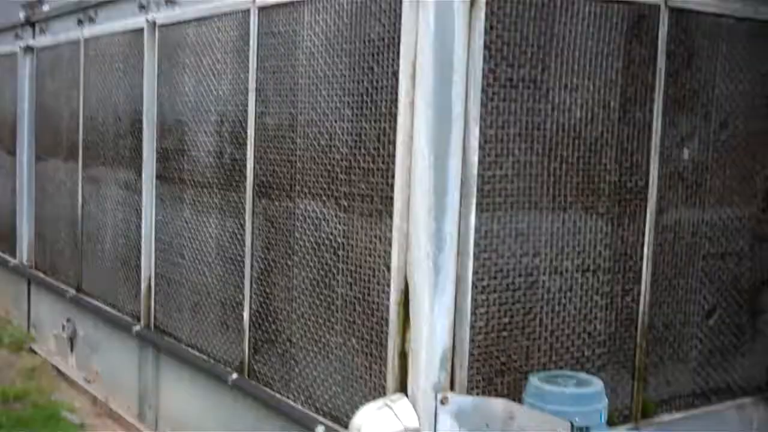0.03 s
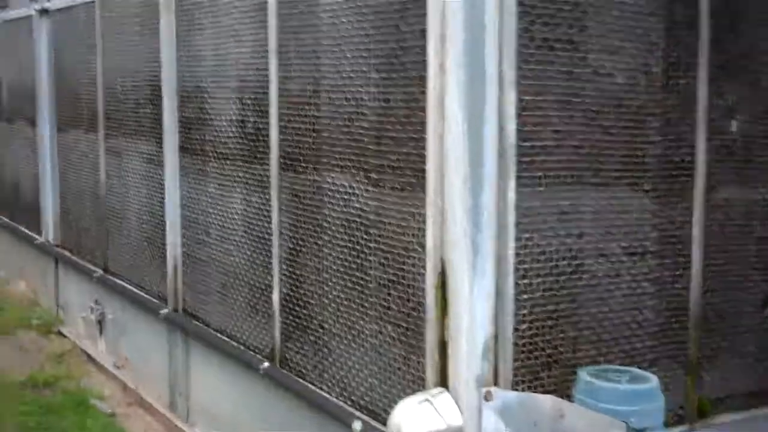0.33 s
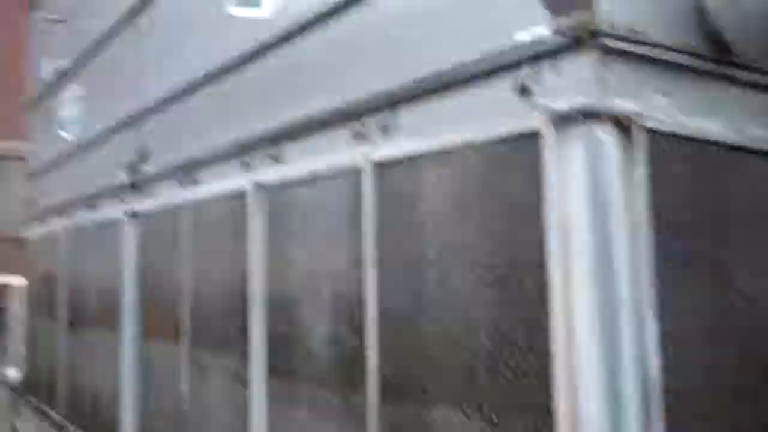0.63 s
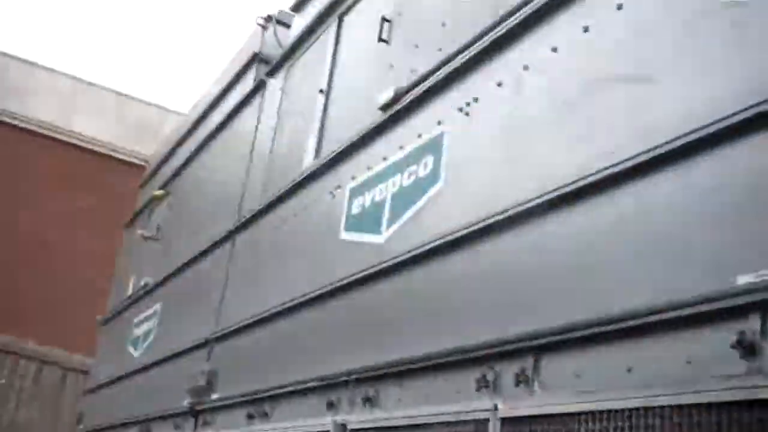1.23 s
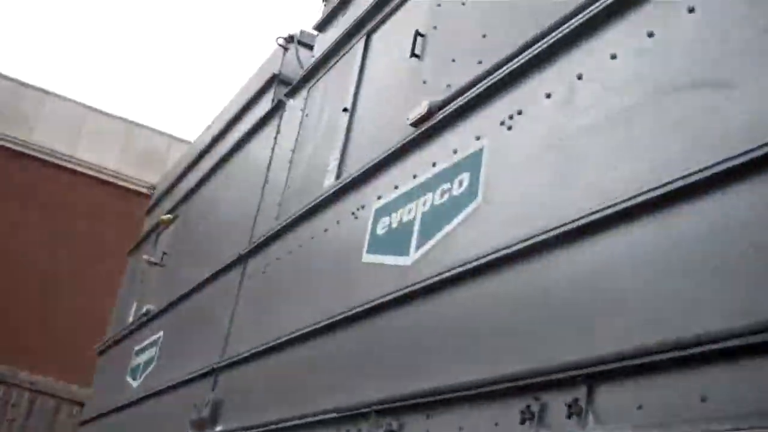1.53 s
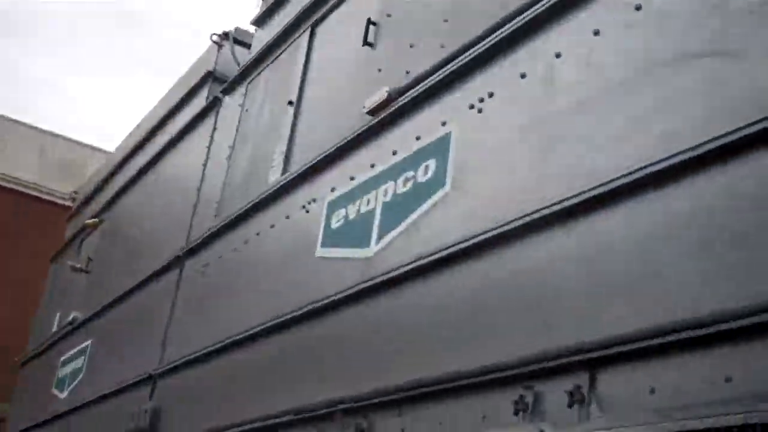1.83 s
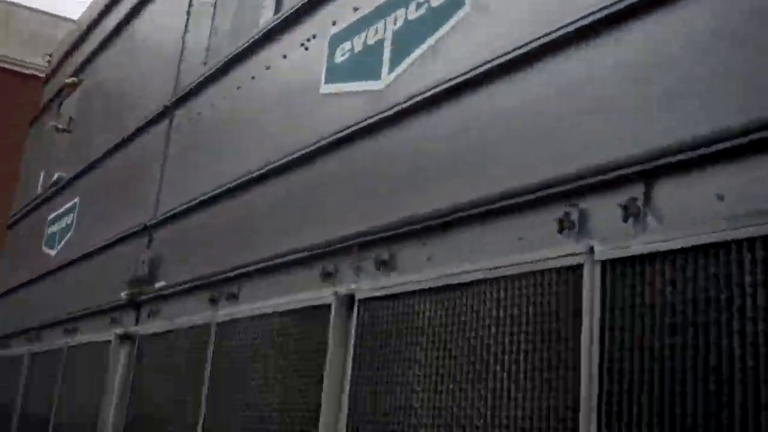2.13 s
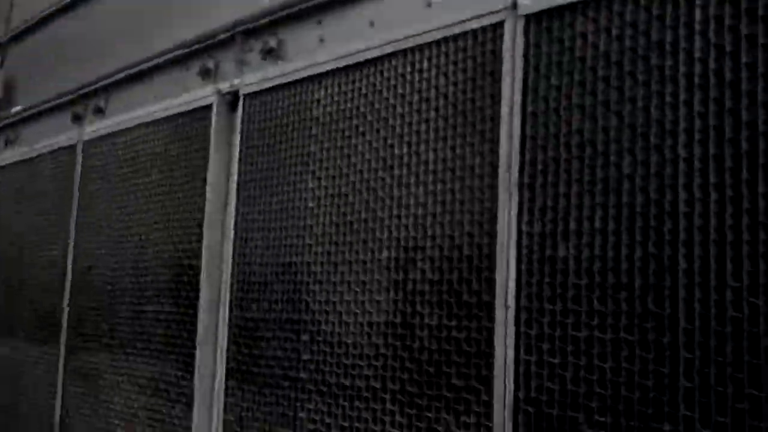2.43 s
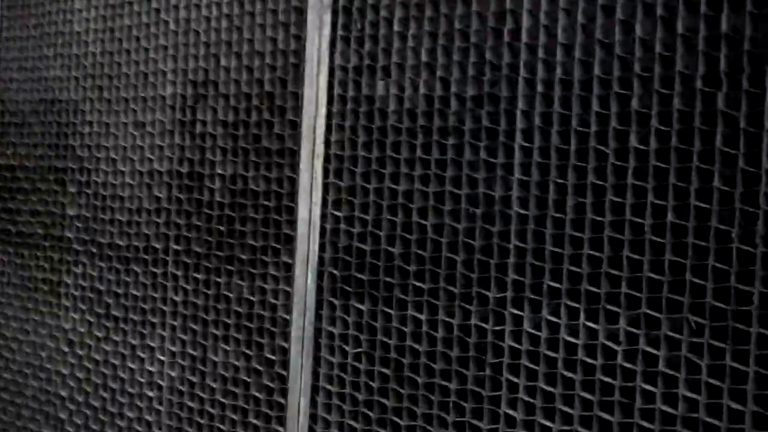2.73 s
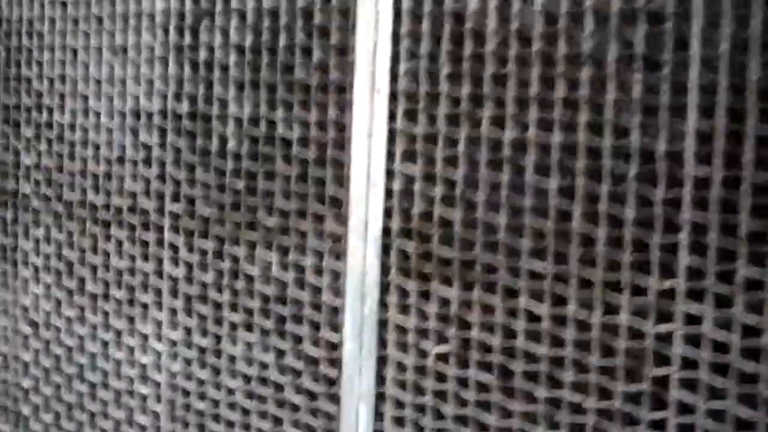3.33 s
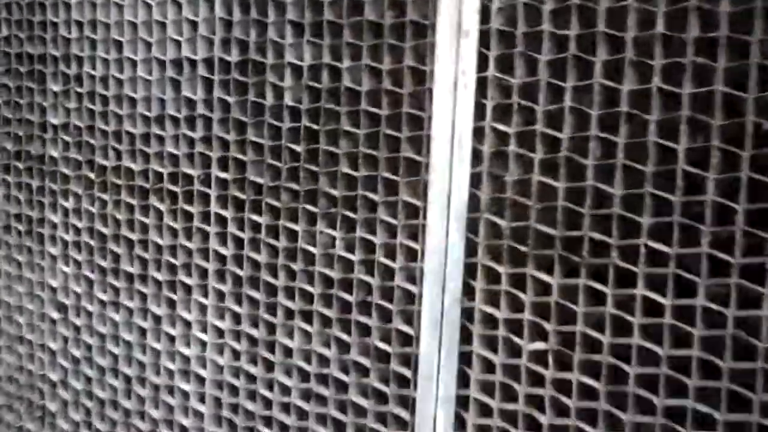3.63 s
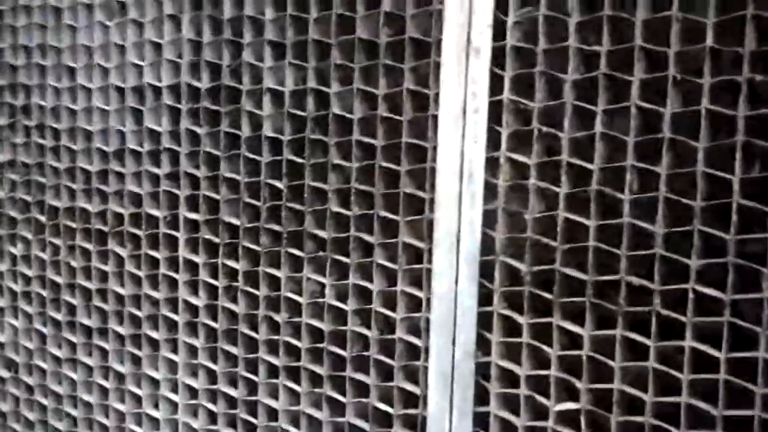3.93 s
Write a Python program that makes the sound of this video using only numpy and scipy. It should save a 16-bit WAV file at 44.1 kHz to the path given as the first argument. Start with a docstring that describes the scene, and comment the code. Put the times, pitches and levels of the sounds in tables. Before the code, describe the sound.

Water cascades inside a cooling tower, roaring and hissing over a low fan rumble.

```python
"""After a short stutter comes the steady rush of water falling through a large cooling tower.
It is heard from just outside the louvres (the slats in its wall). Water pouring into the basin roars,
fine spray and drops hiss, and one brief splash stands out. Underneath, the fan rumbles and hums.
Wind brushes the microphone's two ports (its openings), and each port rings in the treble."""
import sys
import numpy as np
from scipy import signal
from scipy.fft import rfft, irfft
from scipy.io import wavfile
from scipy.ndimage import uniform_filter1d

SR = 44100
rng = np.random.default_rng(int(sys.argv[2]) if len(sys.argv) > 2 else 0)


def generate_wav(signal):
    """Clip the signal to [-1, 1] and save it as 16-bit WAV at the path in sys.argv[1]."""
    frames = np.transpose(np.atleast_2d(signal))
    scaled = np.clip(frames, -1, 1) * 32767
    pcm = np.round(scaled).astype(np.int16)
    wavfile.write(sys.argv[1], SR, pcm)


N = 176400
TIME = np.arange(N) / SR
HZ = np.fft.rfftfreq(N, 1 / SR)
HOP = 128  # samples

# How the water's loudness changes as the microphone moves along the tower.
# Columns: time_s, roar_gain_db, spray_gain_db, roar_bass_boost_db
WATER_LEVELS = [(.22, -26, -19, -1), (.395, -25, -19.5, -0.5), (.415, -24, -16.5, -1), (.6, -25, -18.5, -1),
                (.85, -25, -18.5, 1.3), (1.15, -24.5, -20, 0.5), (1.4, -24, -19, 2), (1.85, -24, -19, 1),
                (2.12, -23, -20, -2.5), (2.35, -24, -17.5, 2.5), (2.7, -24, -17, 0.7),
                (3.0, -25, -17, -0.1), (3.3, -25, -17.5, 1.5), (3.6, -26, -18.5, 0.4),
                (4.0, -24.5, -18, -1)]
# Tone colour of water falling into the basin. Columns: pitch_hz, relative_level_db
ROAR_COLOUR = [(120, -36), (250, -7.5), (350, -4), (450, -6), (550, 0.5), (780, -0.5), (1000, -1.45),
               (1450, -2.5), (2150, -0.9), (2800, -1), (4500, -8), (8000, -11.5), (14000, -33)]
# Tone colour of fine spray on the louvres. Columns: pitch_hz, relative_level_db
SPRAY_COLOUR = [(500, -19), (2000, -23), (3200, -4.5), (4500, -1.34), (7000, 0.5), (10000, -4.5),
                (14000, -6.5)]


def amp(db):
    """Turns decibels into a number to multiply by."""
    return 10 ** (np.asarray(db) / 20)


def unit(x):
    """Scales a signal to an average strength (rms) of one."""
    return x / np.sqrt(np.mean(x ** 2) + 1e-20)


def over_pitch(table):
    """Joins a table's rows into curves over pitch, one for each column after the first."""
    hz, *columns = np.transpose(table)
    return np.squeeze([np.interp(np.log(HZ + 1), np.log(hz), column) for column in columns])


def over_time(table, times=TIME):
    """Joins a table's rows into curves over time, one for each column after the first."""
    time_s, *columns = np.transpose(table)
    return [np.interp(times, time_s, column) for column in columns]


def noise():
    """Two unrelated white noises."""
    return rng.standard_normal((2, N))


def wobble(rate_hz):
    """A random wavering, from 1 Hz up to about the given rate."""
    return unit(irfft(rfft(rng.standard_normal(N)) * (HZ > 1) / (1 + (HZ / rate_hz) ** 4), N))


def bumps(table):
    """A smooth rise and fall in loudness for each row."""
    return sum(amp(db) * np.exp(-2 * ((TIME - peak_s) / length_s) ** 2) for peak_s, length_s, db in table)


def at_ports(pair, colour_db):
    """Blends and colours two unrelated signals: a wide source reaches the two ports only partly alike."""
    # How alike the ports sound. Columns: pitch_hz, likeness (0 to 1), right_lead_radians
    port_likeness = [(30, .5, 0), (70, .7, 0), (150, 0.98, 0), (410, 1, 0.098), (1000, 0.89, 0.015),
                     (2250, 0.84, 0.44), (3870, 0.5, 1.2), (6100, 0.55, 1.6), (7060, 0.17, 0.36),
                     (8700, .08, 0.1), (14000, .04, 1)]
    likeness, lead = over_pitch(port_likeness)
    likeness = np.clip(likeness, 0, 1)
    left, other = rfft(pair)
    right = (likeness * left + np.sqrt(1 - likeness ** 2) * other) * np.exp(1j * lead)
    return unit(irfft(np.array([left, right]) * amp(colour_db), N))


def churn(water, depth_db, patch_s, patch_hz):
    """Makes random patches of time and pitch louder or softer, as streams break up and rejoin."""
    framing = dict(nperseg=4 * HOP, noverlap=3 * HOP)
    hz, times, slices = signal.stft(water, SR, **framing)
    patches = rng.standard_normal((len(times), len(hz))).T
    patches = uniform_filter1d(patches, max(1, round(patch_s * SR / HOP)), axis=1)
    patches = uniform_filter1d(patches, max(1, round(patch_hz / hz[1])), axis=0)
    _, churned = signal.istft(slices * amp(depth_db * unit(patches)), **framing)
    return unit(churned[:, :N])


def wind():
    """A light, lumpy breeze and a few puffs swirl over each port separately."""
    # Tone colour of the swirling air. Columns: pitch_hz, relative_level_db
    wind_colour = [(20, -16), (40, -13), (65, 4), (110, -3.5), (220, -5.5), (400, -17), (1000, -50)]
    # Puffs of wind on the microphone. Columns: peak_s, length_s, gain_db
    puffs = [(.735, 0.044, -43), (.95, 0.057, -42), (1.055, 0.056, -31), (1.13, 0.055, -47),
             (1.495, .03, -45)]
    swirls = unit(irfft(rfft(noise()) * amp(over_pitch(wind_colour)), N))
    breeze = amp(-61 + 3.1 * wobble(rate_hz=18))
    return (breeze + bumps(puffs)) * swirls * amp([[-4.5], [4.5]])  # stronger on the right


def fan():
    """Air rumbles through the fan, while the fan and its casing hum a few unsteady tones."""
    # Tones of the fan and casing. Columns: pitch_hz, width_hz, gain_db
    tones = [(131.2, 5.6, -51.5), (175, 12, -52), (267.3, 10.5, -44.5), (733, 8.2, -46.5)]
    # The hum swells, then fades as the microphone nears the louvres. Columns: time_s, gain_db
    hum_levels = [(.2, -1), (.9, 3), (2.5, -4.5), (4, -1)]
    # Tone colour of air passing through the fan. Columns: pitch_hz, relative_level_db
    rumble_colour = [(20, -24), (40, -26), (60, -8), (85, -6.5), (110, -1.5), (200, 1), (290, -1),
                     (450, -9), (1000, -19)]
    # Loudness of the rumble. Columns: time_s, gain_db
    rumble_levels = [(.3, -40), (1.5, -39), (2.1, -37), (2.5, -39.5), (4, -41.5)]
    hum = 0
    for pitch_hz, width_hz, gain_db in tones:
        peak_db = -20 * np.log10(1 + ((HZ - pitch_hz) / width_hz) ** 2)
        hum += amp(gain_db) * at_ports(noise(), peak_db)  # so narrow a band sounds like a wavering tone
    rumble_db = over_time(rumble_levels)[0] + 1.2 * wobble(rate_hz=11)
    rumble = at_ports(noise(), over_pitch(rumble_colour))
    return amp(over_time(hum_levels)[0]) * hum + amp(rumble_db) * rumble


def splash():
    """One louder splash: a very short burst of roar and spray together."""
    # When the splash lands. Columns: peak_s, length_s, level_db
    splashes = [(.413, 0.006, -18)]
    body = at_ports(noise(), over_pitch(ROAR_COLOUR))
    hiss = at_ports(noise(), over_pitch(SPRAY_COLOUR))
    return bumps(splashes) * unit(body + hiss)


def spray():
    """Countless far droplets blur into a hiss and nearer ones tick, all fluttering together."""
    # The highest treble changes as the microphone turns. Columns: time_s, boost_db
    treble_levels = [(.5, -1), (1.1, 3.3), (2.2, 2.5), (3.2, -0.5)]
    drops_per_s, size_spread_db, treble_hz = 5900, 3, 8700
    colour_db = over_pitch(SPRAY_COLOUR)
    hiss = churn(at_ports(noise(), colour_db), depth_db=0.9, patch_s=0.051, patch_hz=1200)
    sizes = amp(size_spread_db * np.minimum(rng.exponential(1, (2, N)), 5))  # many small, few large
    signs = rng.choice([-1, 1], (2, N))
    landings = rng.random((2, N)) < drops_per_s / SR
    ticks = at_ports(sizes * signs * landings, colour_db)
    flutter = amp(0.23 * wobble(rate_hz=40))
    droplets = (amp(-2) * hiss + amp(-5.5) * ticks) * flutter
    body = irfft(rfft(droplets) / (1 + (HZ / treble_hz) ** 12), N)
    treble = droplets - body
    return body + amp(over_time(treble_levels)[0]) * treble


def basin_roar():
    """Falling water churns the basin; its bass and two narrow bands shift with the listener's place."""
    # A narrow band of the roar swells and sinks. Columns: time_s, pitch_hz, boost_db
    swells = [(.4, 2170, -6), (.8, 2120, 3.5), (1.6, 2460, -3.5), (1.8, 2060, 5), (2.0, 2130, 2.5),
              (2.2, 2210, -3), (2.8, 2120, 3), (3.2, 2100, -0.5)]
    # A hollow-sounding band fades towards the louvres. Columns: time_s, boost_db
    hollow_levels = [(.5, 2.5), (1.3, -0.1), (2.6, 0), (3.0, -2.5), (3.7, -3.5)]
    swell_width_hz, hollow_hz, hollow_width_hz, bass_hz = 80, 780, 56, 900
    water = at_ports(noise(), over_pitch(ROAR_COLOUR))
    water = churn(water, depth_db=0.9, patch_s=0.041, patch_hz=291.4)
    framing = dict(nperseg=8 * HOP, noverlap=6 * HOP)
    hz, times, slices = signal.stft(water, SR, **framing)
    hz = hz[:, None]
    swell_hz, swell_boost_db = over_time(swells, times)
    hollow_boost_db, = over_time(hollow_levels, times)
    _, _, bass_boost_db = over_time(WATER_LEVELS, times)
    swell_db = swell_boost_db * np.exp(-0.5 * ((hz - swell_hz) / swell_width_hz) ** 2)
    hollow_db = hollow_boost_db * np.exp(-0.5 * ((hz - hollow_hz) / hollow_width_hz) ** 2)
    bass_db = bass_boost_db / (1 + (hz / bass_hz) ** 4)
    _, roar = signal.istft(slices * amp(2.5 + swell_db + hollow_db + bass_db), **framing)
    return roar[:, :N]


def scene():
    """The falling water, with the fan and the wind beneath it."""
    roar_db, spray_db, _ = over_time(WATER_LEVELS)
    water = splash() + amp(roar_db) * basin_roar() + amp(spray_db) * spray()
    return water + fan() + wind()


def record(dry):
    """Each port rings in the treble, the sound cuts in with a stutter, and the very top is cut off."""
    # Tone colour of the left and right microphone ports. Columns: pitch_hz, boost_db
    left_port = [(50, -3.5), (130, -2), (300, -1), (4000, -1), (5500, .8), (6400, 3.3), (7200, 7),
                 (7900, 9.2), (8400, 5.2), (9100, 0), (10000, -3.5), (13000, -9)]
    right_port = [(50, 1), (130, 1.2), (300, 1), (4000, 1.3), (5500, 4), (6300, 9.8), (6750, 9.5),
                  (7300, 3.7), (7900, -2.4), (8900, -6.2), (10000, -12), (12000, -19.8), (14000, -30)]
    start_s, dropout_s, fade_s, resume_s = 0.1726, 0.182, 0.009, 0.2088
    cutoff_hz = 14250
    ringing = irfft(rfft(dry) * amp([over_pitch(left_port), over_pitch(right_port)]), N)
    first_blip = (TIME >= start_s) * np.clip(1 - (TIME - dropout_s) / fade_s, 0, 1)
    stuttered = ringing * np.where(TIME < resume_s, first_blip, 1)
    low_pass = signal.firwin(511, cutoff_hz, window=("kaiser", 9), fs=SR)
    return signal.oaconvolve(stuttered, low_pass[None], "same")


dry = scene()
out = record(dry)
generate_wav(out)
```